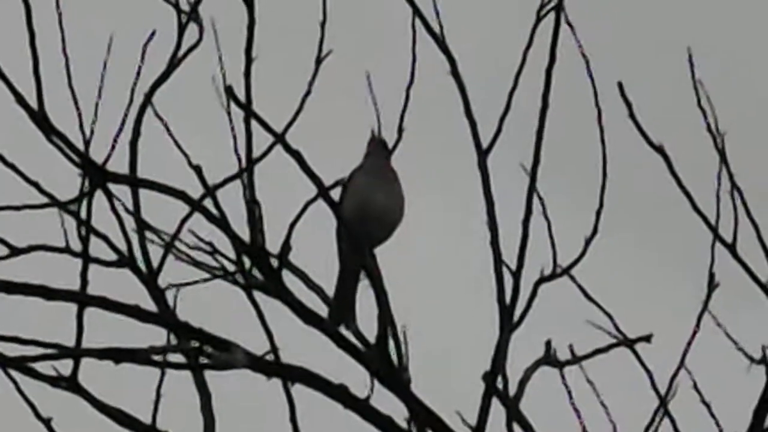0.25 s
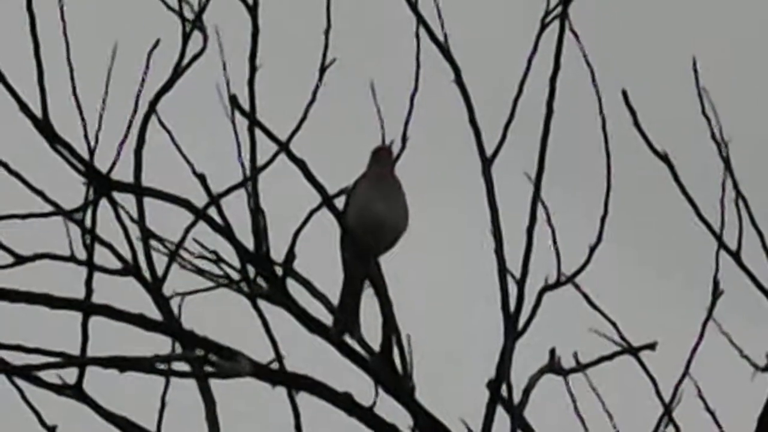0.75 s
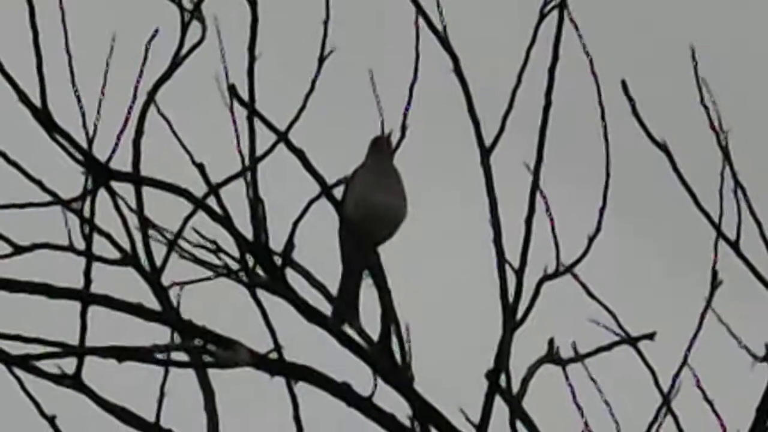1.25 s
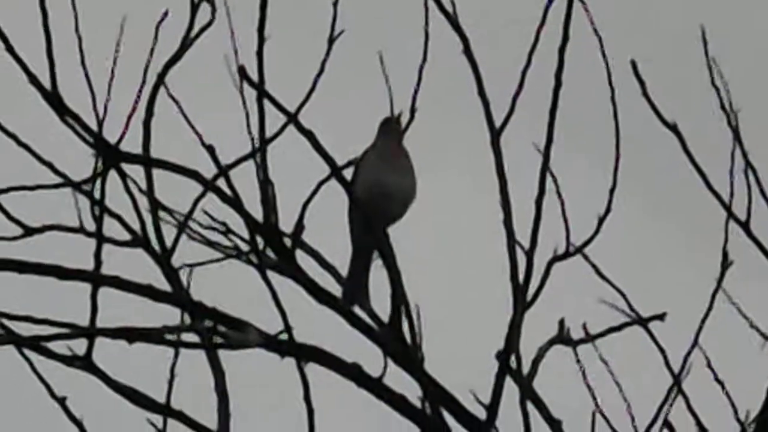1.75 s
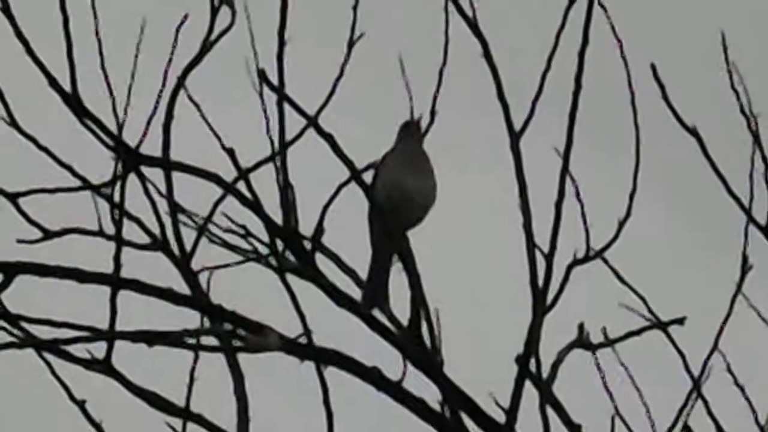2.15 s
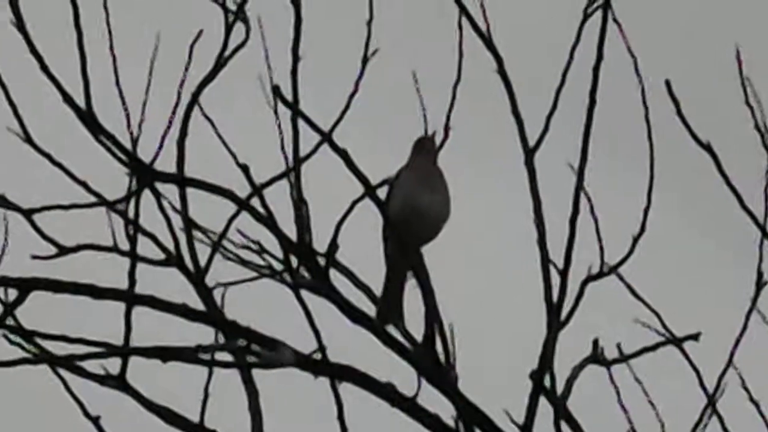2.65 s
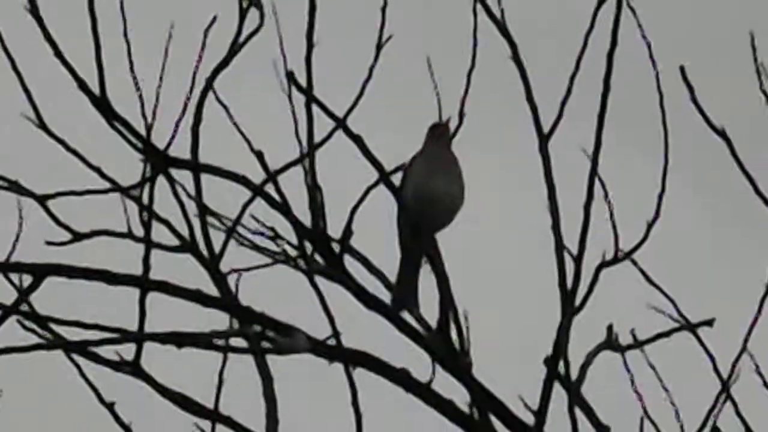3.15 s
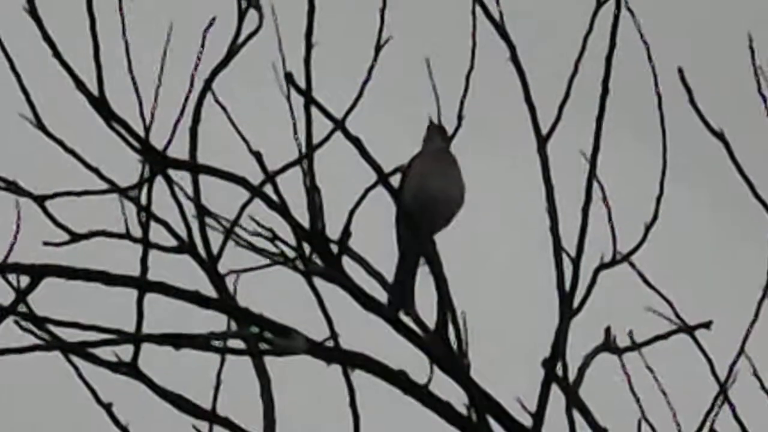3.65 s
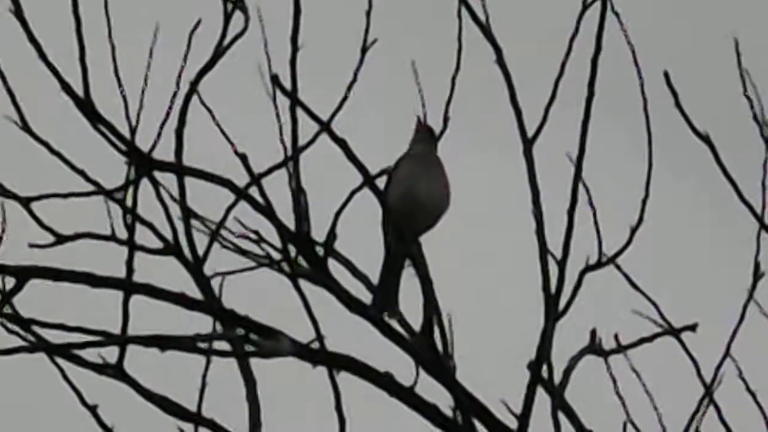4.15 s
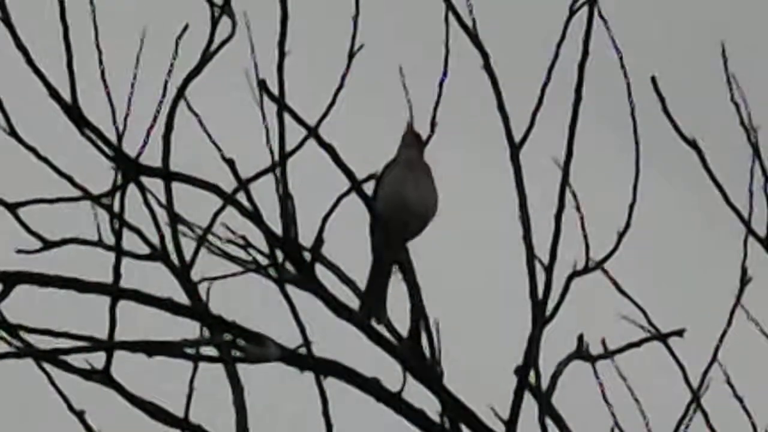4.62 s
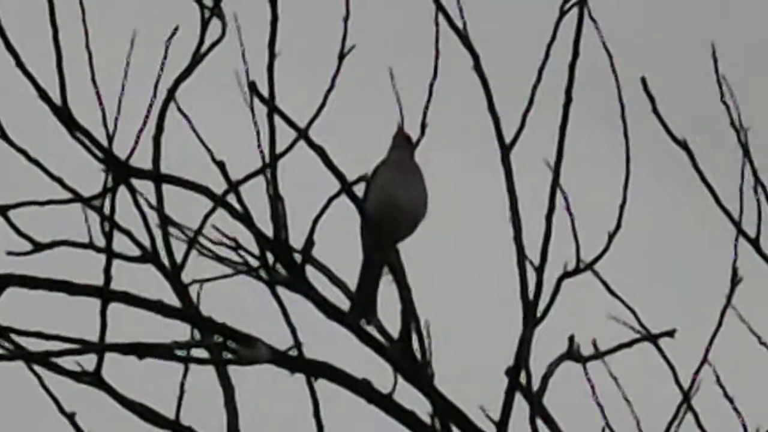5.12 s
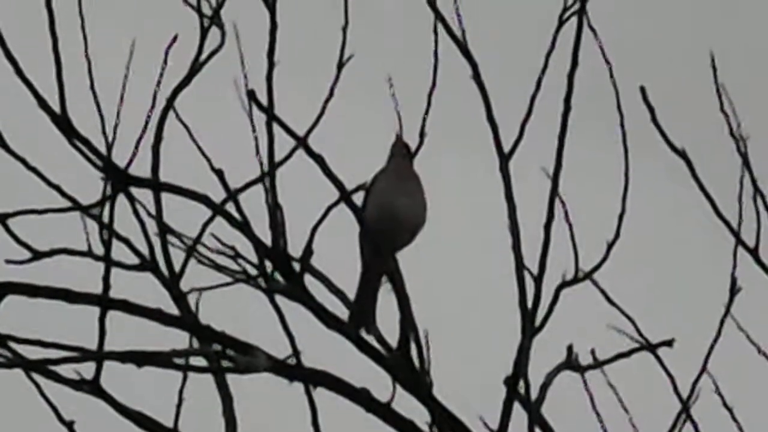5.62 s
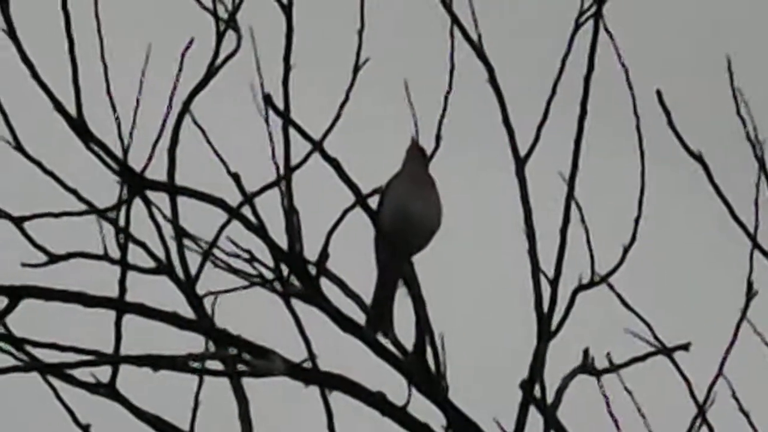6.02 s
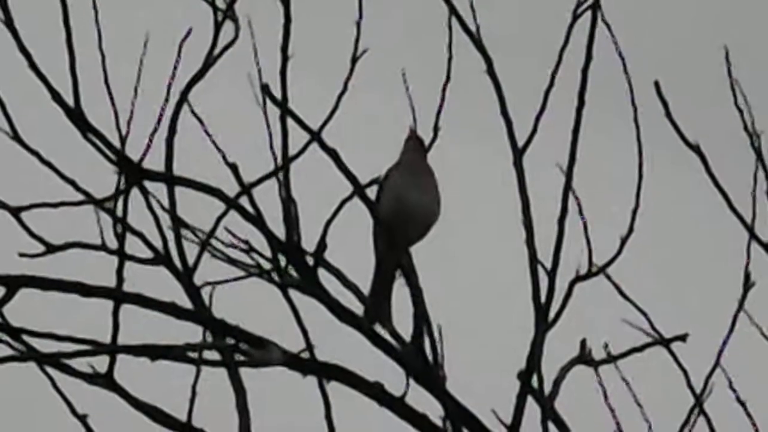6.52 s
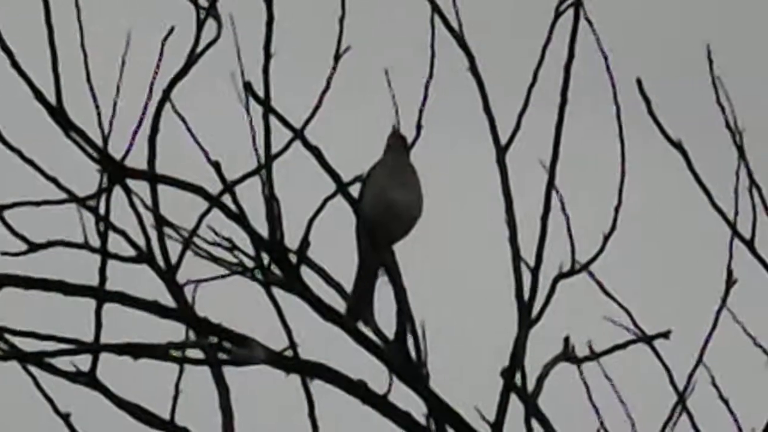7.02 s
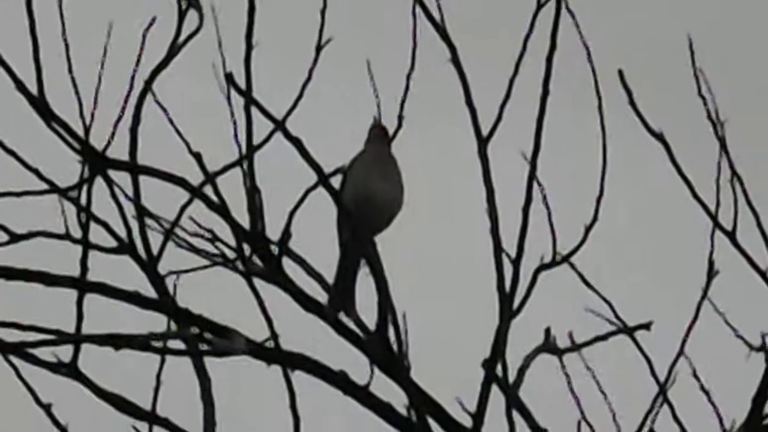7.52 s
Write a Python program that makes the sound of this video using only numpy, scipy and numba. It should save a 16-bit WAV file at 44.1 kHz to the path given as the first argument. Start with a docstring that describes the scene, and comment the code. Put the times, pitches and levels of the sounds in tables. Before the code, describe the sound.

A thrush whistles slurs and a short trill outdoors, with distant birds, light drips and a low traffic rumble behind it.

```python
"""Thrush after rain

A thrush in a bare tree whistles slurs, held notes and a trill, each a nearly pure tone of its syrinx,
reflected by trunks and walls. Far birds answer, heard mostly as scattered sound; small birds call thinly
and drops fall from twigs, over a low traffic rumble and the hiss of damp air.
A limiter ducks the background under the loudest notes."""
import sys
import numpy as np
from scipy import signal
from scipy.fft import rfft, irfft, next_fast_len
from scipy.io import wavfile
from scipy.ndimage import uniform_filter1d, map_coordinates
from numba import njit

SR = 44100
rng = np.random.default_rng(int(sys.argv[2]) if len(sys.argv) > 2 else 0)


def materialize(psi):
    """Save the field psi as 16-bit PCM at rate SR to the path in sys.argv[1].

    A 1-D psi becomes a single channel; in a 2-D psi each row is a channel.
    """
    bounded = np.clip(np.atleast_2d(psi).T, -1, 1)
    quanta = np.round(bounded * 32767).astype(np.int16)
    wavfile.write(sys.argv[1], SR, quanta)


N = 342657


def amp(db):
    """Amplitude ratio: a factor of ten for every 20 dB."""
    return 10 ** (np.asarray(db) / 20)


def unit(x):
    """Normalisation to an rms of 1."""
    return x / np.sqrt(np.mean(x ** 2) + 1e-20)


def along(points, hz):
    """Interpolation of (frequency, value) points on a logarithmic frequency axis."""
    point_hz, values = np.transpose(points)
    return np.interp(np.log(hz + 1), np.log(point_hz + 1), values)


def envelope(points):
    """Linear interpolation of (time, value) points over the whole scene."""
    return np.interp(np.arange(N) / SR, *np.transpose(points))


def clock(length_s):
    """Time through a note, in seconds and as a share of its length."""
    t = np.arange(max(int(length_s * SR), 64)) / SR
    return t, t / t[-1]


def wobble(rate_hz, size):
    """Random modulation: a smooth curve through rate_hz random values a second."""
    knots = rng.standard_normal(int(size * rate_hz / SR) + 4)
    return map_coordinates(knots, [np.arange(size) * rate_hz / SR])


def filtered(x, response):
    """Linear filtering: the spectrum is multiplied by a frequency response."""
    size = next_fast_len(N + SR // 2)
    return irfft(rfft(x, size) * response(np.fft.rfftfreq(size, 1 / SR)), size)[:N]


def coloured(x, colour):
    """Spectral shaping by (frequency_hz, gain_db) points."""
    return filtered(x, lambda hz: amp(along(colour, hz)))


def noise(colour):
    """Spectrally shaped white noise of rms 1."""
    return unit(coloured(rng.standard_normal(N), colour))


def add(track, start_s, sound):
    """Superposition: a sound sums into the track from its start time."""
    i = int(np.clip(round(start_s * SR), 0, N - 1))
    track[i:i + len(sound)] += sound[:N - i]


def whistle(hz, gain, waver, overtone_db=-58):
    """Nearly sinusoidal oscillation, as of a syrinx; waver is the relative jitter of its frequency."""
    phase = 2 * np.pi * np.cumsum(hz * (1 + waver * wobble(299.9, len(hz)))) / SR
    edges = signal.windows.tukey(len(hz), min(1, 256 / len(hz)))
    return np.sqrt(2) * gain * edges * (np.sin(phase) + amp(overtone_db) * np.sin(2 * phase))


def glides(notes, waver, twitter=0):
    """Exponential sweeps that swell and fade; twitter adds jitter in proportion to the interval swept."""
    out = np.zeros(N)
    for start_s, length_s, first_hz, last_hz, level_db in notes:
        _, u = clock(length_s)
        pitch = first_hz * (last_hz / first_hz) ** u
        swell = np.abs(np.sin(np.pi * u)) ** .5
        jitter = waver + twitter * abs(np.log(last_hz / first_hz))
        add(out, start_s, whistle(pitch, amp(level_db) * swell, jitter))
    return out


# Reflections from nearby trunks: delay_s, gain_db
TRUNK_REFLECTIONS = [(.009, -14), (.01725, -9), (.026, -17), (.046, -19)]

def trunk_echoes(x):
    """Interference: a few delayed copies beat against each glide."""
    out = np.zeros(N)
    for delay_s, gain_db in TRUNK_REFLECTIONS:
        add(out, delay_s, amp(gain_db) * x)
    return out


# Time to decay by 60 dB among the trees, before scaling by stretch: frequency_hz, decay_s
TREE_DECAY = [(2000, 0.44), (3500, 0.86), (8000, 0.55)]

def tree_scatter(x, stretch, build_s):
    """Reverberation: scattered sound builds up, then each frequency decays at its own rate."""
    hz, t, spectrum = signal.stft(rng.standard_normal(SR), SR, nperseg=256)
    decay_s = stretch * along(TREE_DECAY, hz)[:, None]
    shape = amp(-60 * t / decay_s) * (1 - np.exp(-t / build_s))
    tail = signal.istft(spectrum * shape, SR, nperseg=256)[1]
    return signal.fftconvolve(x, tail / np.linalg.norm(tail))[:N]


# Course of the deep throb: time_s, level_db
THROB_LEVEL = [(0, -40.5), (.5, -32), (1.0, -41.5), (1.7, -27.5), (2.7, -32), (3.1, -39.5), (3.96, -28.5),
               (4.65, -24.5), (5.1, -27), (5.5, -32.5), (6.2, -42), (7.77, -38)]
# Spectrum of the rumble: frequency_hz, relative_density_db
RUMBLE_SPECTRUM = [(24, -35), (40, 7.5), (136, -3), (162, -26), (220, -51), (290, -57.5), (480, -120)]

def far_traffic():
    """Low-frequency noise: a throb peaking at 35 Hz swells and fades over an almost steady rumble."""
    throb = noise([(12, -25), (22, -7.5), (31, -3.5), (35, 2.5), (39, -4.5), (55, -11.5), (110, -89)])
    rumble_db = -35.5 + .25 * wobble(2.77, N)
    return amp(envelope(THROB_LEVEL)) * throb + amp(rumble_db) * noise(RUMBLE_SPECTRUM)


# Spectrum of the hiss: frequency_hz, relative_density_db
AIR_SPECTRUM = [(90, -25), (160, -3), (260, -8), (500, -11), (900, -14), (1300, -13.5), (1800, -11),
                (2500, -9.5), (3250, 0), (4000, -12), (5000, -19.5), (6300, -28), (9000, -35), (15700, -43)]
# Course of the hiss: time_s, level_db
HISS_LEVEL = [(0, -34), (1.8, -35), (3, -35), (4.8, -34), (6, -35.5), (7.77, -37)]

def damp_air(patch_db=1.97, patchy_below_hz=2000):
    """Amplitude-modulated noise: the hiss wavers, and below the treble it swells and fades in patches."""
    level_db = envelope(HISS_LEVEL) + .72 * wobble(8.1, N)
    hz, _, spectrum = signal.stft(noise(AIR_SPECTRUM), SR, nperseg=2048)
    patches = uniform_filter1d(rng.standard_normal(spectrum.shape), size=3, axis=0)  # across frequency
    patches = unit(uniform_filter1d(patches, size=11, axis=1))  # across time
    spectrum *= amp(patch_db * patches * (hz < patchy_below_hz)[:, None])
    return amp(level_db) * signal.istft(spectrum, SR, nperseg=2048)[1][:N]


# Faint hums and pips: start_s, length_s, first_hz, last_hz, level_db
LOW_NOTES = [(.095, 0.038, 1180, 1015, -38), (2.48, 0.024, 1000, 1240, -34.5), (4.3, 0.7, 615, 612, -48.5),
             (4.6, .3, 325, 310, -41.5), (5.15, 0.34, 289, 241, -48), (6.1, 0.024, 750, 836, -38)]

def far_hums():
    """Indirect propagation: low notes from far off arrive only as scattered sound."""
    return tree_scatter(glides(LOW_NOTES, waver=.012), stretch=.35, build_s=.004)


def chorus(count=80, centre_hz=3250):
    """Diffuse field: reverberation blurs the random glides of the farthest birds into a shimmer."""
    offset, length, height, slope, strength = rng.random((count, 5)).T
    start_s = (np.arange(count) + offset) / count * N / SR
    first_hz = centre_hz * np.exp(.27 * (height - .5))
    last_hz = first_hz * np.exp(.33 * (slope - .5))
    notes = zip(start_s, .04 + .091 * length, first_hz, last_hz, -42 + 6 * strength)
    return tree_scatter(glides(notes, waver=.015), stretch=.9, build_s=.02)


def patter(count=54, decay_s=.035):
    """Random impacts: faint drops tick in the twigs, each an exponentially decaying noise burst."""
    out, t = np.zeros(N), np.arange(SR // 30) / SR
    for when, size in rng.random((count, 2)):
        level_db = -45 + 7 * size ** 2 - 60 * t / decay_s
        add(out, when * N / SR, amp(level_db) * rng.standard_normal(len(t)))
    return coloured(out, [(1000, -20), (4500, 2), (8000, -3), (11000, -9), (15000, -15)])


# The nearest drops, before spectral shaping: start_s, level_db, ring_hz
DROP_IMPACTS = [(0.534, -24.5, 5300), (1.224, -24.5, 5600), (1.374, -25.5, 4460), (1.73, -35, 9000),
                (1.964, -23.5, 3260), (2.334, -22, 4400), (2.748, -27.5, 7500), (2.836, -24, 4650),
                (2.859, -22.5, 3850), (2.93, -25, 3310), (5.098, -32, 4900), (5.533, -24.5, 5300),
                (5.81, -28, 7000), (6.61, -23, 4450), (6.656, -19.5, 5400), (6.833, -25, 5260),
                (7.512, -21, 4500), (7.629, -15.5, 3170)]

def near_drops(ring_peak_s=.00048, splash_decay_s=.025):
    """Damped oscillation: each impact gives a ring of a few cycles and a splashy tick."""
    out, t = np.zeros(N), np.arange(SR // 25) / SR
    age = t / ring_peak_s
    for start_s, level_db, ring_hz in DROP_IMPACTS:
        ring = age * np.exp(1 - age) * np.sin(2 * np.pi * ring_hz * t)
        splash_gain = .45 * amp(-60 * t / splash_decay_s) * (1 - np.exp(-2 * age))
        add(out, start_s, amp(level_db) * (ring + splash_gain * rng.standard_normal(len(t))))
    out = coloured(out, [(500, -36.5), (2000, 6), (3200, 12), (5500, -2.5), (9000, -11.5), (15000, -29.5)])
    return out + trunk_echoes(out) + amp(-6) * tree_scatter(out, stretch=.28, build_s=.0014)


# Almost level peeps: start_s, pitch_hz, relative_db
SMALL_PEEPS = [(.135, 6800, -44), (0.718, 6020, -43), (0.949, 7840, -42.5), (1.715, 7840, -39.5),
               (2.829, 7460, -44.5), (2.93, 8380, -47), (3.535, 7930, -39.5), (5.512, 7660, -41),
               (6.421, 7680, -42), (7.307, 8010, -44)]
# Louder falling calls: start_s, relative_db
SMALL_SLURS = [(0.181, -31.5), (4.002, -33.5), (7.02, -31)]

def small_birds(peep_s=.035, peep_fall=.02, slur_s=.034, top_hz=7580, bottom_hz=6190):
    """Random frequency modulation gives high contact calls a slight buzz."""
    calls = [(s, peep_s, hz, hz * (1 - peep_fall), db) for s, hz, db in SMALL_PEEPS]
    calls += [(s, slur_s, top_hz, bottom_hz, db) for s, db in SMALL_SLURS]
    voices = glides(calls, waver=.012, twitter=.14)
    return amp(-7) * (voices + tree_scatter(voices, stretch=.9, build_s=.0039))


def far_run(start_s=3.237, every_s=.097, length_s=.082, top_hz=6750, bottom_hz=3100, hold=.091):
    """Four even down-sweeps: each hangs at the top, then drops about an octave as jitter turns it raspy."""
    out = np.zeros(N)
    _, u = clock(length_s)
    pitch = np.interp(u, [0, hold, .45, 1], [top_hz, top_hz * .98, 4800, bottom_hz])
    level_db = np.interp(u, [0, .25, .5, 1], [-31.5, -42, -31.5, -26.5])
    rasp = .075 * np.clip(4 * (u - hold), 0, 1)
    for k in range(4):
        add(out, start_s + k * every_s, whistle(pitch, amp(level_db), waver=.0023 + rasp))
    return out


# Held whistles that drift upward: start_s, length_s, pitch_hz, relative_db
DISTANT_WHISTLES = [(.47, 0.242, 3521, -28), (.81, 0.154, 3535, -27), (0.999, 0.178, 3060, -22.5),
                    (3.116, 0.039, 2540, -32), (4.287, 0.036, 4870, -24.5), (5.073, 0.32, 3110, -26),
                    (5.49, 0.2, 3540, -27.5), (5.79, .18, 3514, -27.5)]
# Down-slurs over one shared range: start_s, length_s, relative_db
DISTANT_SLURS = [(0.575, 0.12, -34.5), (1.136, .08, -34.5), (1.27, 0.11, -35.5), (2.536, .12, -32.5),
                 (2.959, 0.13, -40), (3.79, .09, -38), (3.956, 0.04, -28.5), (4.725, .08, -28),
                 (5.252, 0.065, -24), (5.642, 0.053, -28), (6.224, .18, -34), (6.41, 0.15, -38.5),
                 (6.964, 0.099, -29)]
# Falling chips: start_s, first_hz, relative_db
DISTANT_CHIPS = [(0.469, 4110, -30), (.785, 3505, -21), (2.64, 3537, -25), (3.6, 3364, -22.5),
                 (3.719, 2920, -26.5), (3.859, 3260, -24), (4.215, 3240, -24), (4.48, 4060, -30.5),
                 (5.69, 3450, -24.5), (5.926, 3410, -23)]
# Upward squeaks: start_s, relative_db
DISTANT_SQUEAKS = [(4.76, -20), (7.202, -20.5)]
# Treble loss over distance: frequency_hz, gain_db
DISTANCE_LOSS = [(4000, 0.5), (5400, -6)]

def far_birds(direct_db=-6.5, drift=.011, chip_s=.051, chip_fall=.1245, squeak_s=.0098):
    """Attenuation with distance: far songs arrive dulled, and scattered sound outweighs direct sound."""
    notes = [(s, length, hz * (1 - drift), hz * (1 + drift), db) for s, length, hz, db in DISTANT_WHISTLES]
    notes += [(s, length, 5205, 3220, db) for s, length, db in DISTANT_SLURS]
    notes += [(s, chip_s, hz, hz * (1 - chip_fall), db) for s, hz, db in DISTANT_CHIPS]
    notes += [(s, squeak_s, 1453, 3280, db) for s, db in DISTANT_SQUEAKS]
    songs = coloured(glides(notes, waver=.004, twitter=.11), DISTANCE_LOSS)
    run = far_run()
    scattered = tree_scatter(songs, stretch=1.05, build_s=.004)
    scattered += tree_scatter(run, stretch=.95, build_s=.001)
    return amp(direct_db) * (songs + run) + scattered


# The thrush's soft warbles: start_s, length_s, first_centre_hz, last_centre_hz, effort_db
THRUSH_WARBLES = [(3.578, .25, 1875, 2235, -15), (4.477, .12, 2276, 2140, -15)]

def warbles(rate_hz=16.3, depth_hz=160, rasp_hz=70, edge_db=5.5):
    """Frequency modulation: a raspy pitch swings about a centre that eases to its last value."""
    for start_s, length_s, first_hz, last_hz, effort_db in THRUSH_WARBLES:
        t, u = clock(length_s)
        centre = last_hz + (first_hz - last_hz) * (1 - u) ** 2
        swing = depth_hz * np.sin(2 * np.pi * rate_hz * t) + rasp_hz * wobble(250, len(t))
        yield start_s, centre + swing, effort_db - edge_db * (2 * u - 1) ** 2


def chip(start_s=4.651, length_s=.008, first_hz=2750, last_hz=3870, effort_db=-8, edge_db=14):
    """A linear upward sweep, so brief that it is heard as one sharp chip."""
    _, u = clock(length_s)
    yield start_s, first_hz + (last_hz - first_hz) * u, effort_db - edge_db * (2 * u - 1) ** 2


def trill(start_s=5.978, length_s=.232, first_hz=2634, last_hz=2350, fade_db=1):
    """Periodic modulation: evenly spaced flicks leap above a sagging tone that swells and fades."""
    first_flick_s, every_s, flick_s, leap_hz, flick_db = .025, .046, .014, 541, -15
    t, u = clock(length_s)
    into_flick = np.clip((t - first_flick_s) % every_s / flick_s, 0, 1)
    flick = np.abs(np.sin(np.pi * into_flick)) ** .5
    low_hz = first_hz + (last_hz - first_hz) * u
    low_db = -5.5 - 16 * np.abs(2 * u - 1)
    yield start_s, low_hz + leap_hz * flick, low_db + (flick_db - low_db) * flick - fade_db * (u - .5)


# Held whistles that follow a slur: start_s, length_s, entry_hz, held_hz, effort_db
THRUSH_HELD_NOTES = [(4.089, 0.092, 2640, 2522, -7), (4.892, .172, 2562, 2845, -3.5)]

def held_notes(settle_s=.0089, entry_db=8, end_lift=.044, end_fade_db=18.5):
    """Transient and steady state: the voice settles on one pitch, then lifts a little as it fades."""
    for start_s, length_s, entry_hz, held_hz, effort_db in THRUSH_HELD_NOTES:
        t, u = clock(length_s)
        entering, ending = np.exp(-(t / settle_s) ** 2), u ** 5.8
        pitch = held_hz * (1 + end_lift * ending) + (entry_hz - held_hz) * entering
        yield start_s, pitch, effort_db - entry_db * entering - end_fade_db * ending


# Slurs (a bend under 1 falls steeply at first; a negative fade swells):
# start_s, rise_s, fall_s, first_hz, turn_hz, last_hz, bend, effort_db, fade_db, flutter_hz
THRUSH_SLURS = [(.177, 0.13, .205, 2033, 3225, 1877, 1.05, -5.5, 21, 36),
                (3.979, .025, 0.085, 3085, 3150, 2667, 1.15, -13.5, -6.5, 101.5),
                (4.372, .016, .072, 2635, 2530, 2063, 2, -13, -5, 29.7),
                (4.831, 0.013, .045, 3370, 3300, 2417, 1.05, -6.5, 7, 90),
                (5.392, 0.014, .095, 3650, 3374, 1758, 0.74, -9, 11.5, 188.4),
                (6.526, 0.025, 0.047, 2866, 3230, 1856, 0.84, -8.5, 8, 49.8),
                (6.625, 0.0068, 0.072, 2350, 2330, 1890, .9, -19, 1, 30)]

def slurs(steps_per_s=56, onset_db=21):
    """Glissando: each slur swells toward a turning pitch, then slides down in small fluttering steps."""
    for row in THRUSH_SLURS:
        start_s, rise_s, fall_s, first_hz, turn_hz, last_hz, bend, effort_db, fade_db, flutter_hz = row
        t, _ = clock(rise_s + fall_s)
        approach, slide = np.clip(1 - t / rise_s, 0, 1), np.clip((t - rise_s) / fall_s, 0, 1)
        pitch = turn_hz + (first_hz - turn_hz) * approach ** 1.15 + (last_hz - turn_hz) * slide ** bend
        flutter = flutter_hz * (1 - slide) * np.sin(2 * np.pi * steps_per_s * (t - rise_s))
        attack_s = .015 + .33 * rise_s
        onset = np.clip(1 - t / attack_s, 0, 1)
        yield start_s, pitch - flutter, effort_db - onset_db * onset - fade_db * slide


# Resonance of the thrush's throat: pitch_hz, gain_db
THROAT_RESPONSE = [(1800, -16), (2100, -10.5), (2350, -7), (2550, -2), (2850, 1), (3200, 1), (3600, 0)]

def thrush(soft_below_db=-8.5):
    """Resonance: the throat favours some pitches; slides tremble, soft notes turn husky and blur."""
    voice, soft_voice = np.zeros(N), np.zeros(N)
    for start_s, hz, effort_db in [*slurs(), *held_notes(), *warbles(), *trill(), *chip()]:
        pitch = uniform_filter1d(hz, size=160)
        level_db = effort_db + along(THROAT_RESPONSE, pitch)
        softness = np.clip((soft_below_db - level_db) / 12, 0, 1)
        sliding = np.clip(np.abs(np.gradient(pitch)) * SR / 8000, 0, 1)  # held pitches are the purest
        tremble_db = 4 * sliding * np.tanh(wobble(220, len(hz)))
        tone = whistle(pitch, amp(level_db + tremble_db), waver=.0005 + .006 * sliding + .009 * softness)
        add(voice, start_s, tone * (1 - .3 * softness))
        add(soft_voice, start_s, tone * softness)
    scattered = tree_scatter(amp(-12) * voice + amp(-11) * soft_voice, stretch=.83, build_s=.011)
    return voice + trunk_echoes(voice) + scattered


def scene():
    """Superposition of birds, drops and background at one point."""
    birds = thrush() + far_birds() + small_birds() + chorus()
    return (birds + near_drops() + patter() + far_hums() + far_traffic() + damp_air())[None]


@njit
def limiter(x, ceiling, step, hold_samples, recovery):
    """Gain control: each peak over the ceiling steps the gain down; it waits, then creeps back."""
    out, target, gain, wait = np.empty_like(x), 1.0, 1.0, 0.0
    for i in range(len(x)):
        out[i] = x[i] * gain
        wait -= 1
        if abs(x[i] * target) > ceiling:
            target, wait = target * step, hold_samples
        elif wait < 0:
            target = min(1.0, target * recovery)
        gain += .5 * (target - gain)  # abrupt enough to click faintly
    return out


def record(dry, ceiling_db=-2.4, step_db=-2.5, hold_s=.08, release_db_per_s=62, top_hz=15780):
    """Peak and band limiting: loud notes duck the whole mix, and the highest treble is cut off."""
    recovery = float(amp(release_db_per_s / SR))
    limited = limiter(dry[0], float(amp(ceiling_db)), float(amp(step_db)), hold_s * SR, recovery)
    return filtered(limited, lambda hz: hz < top_hz)[None]


dry = scene()
out = record(dry)
materialize(out)
```